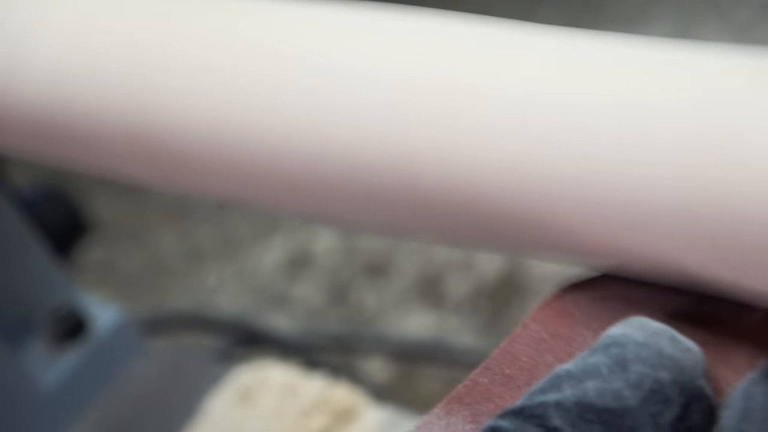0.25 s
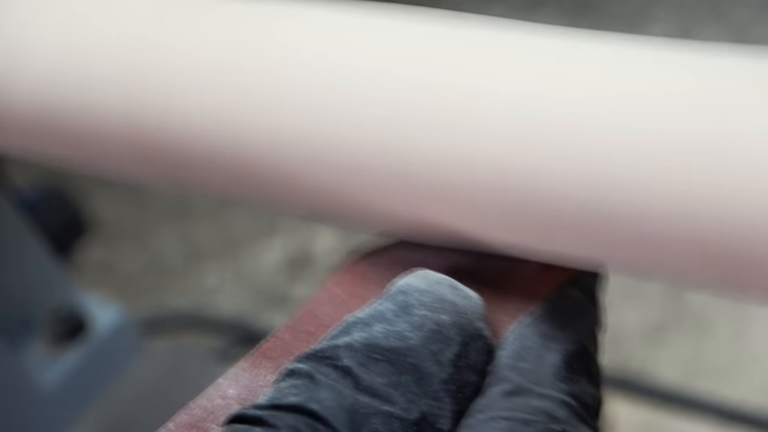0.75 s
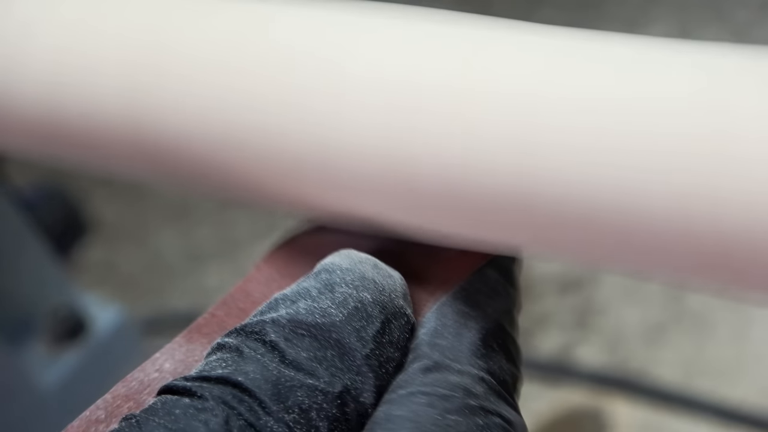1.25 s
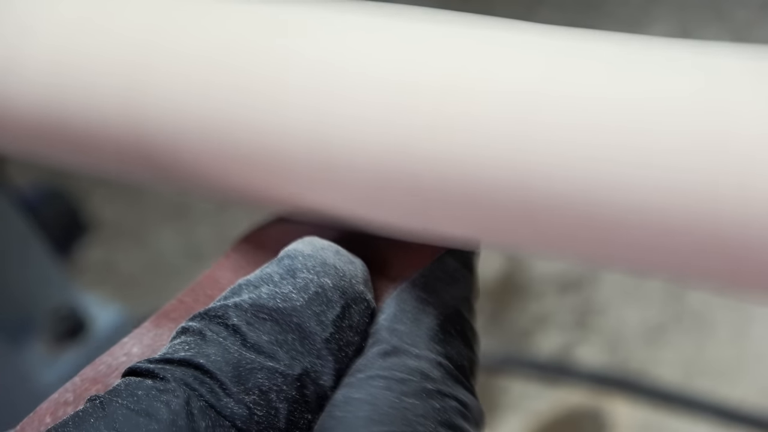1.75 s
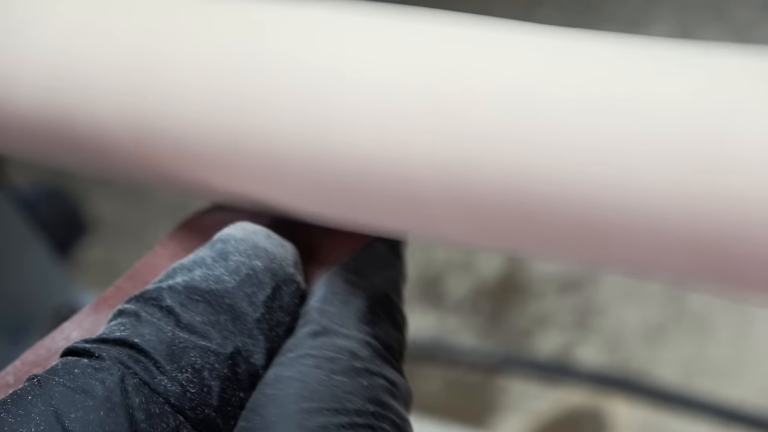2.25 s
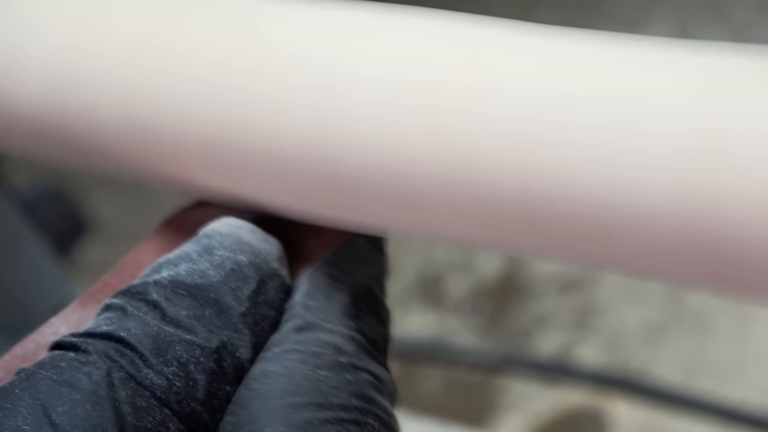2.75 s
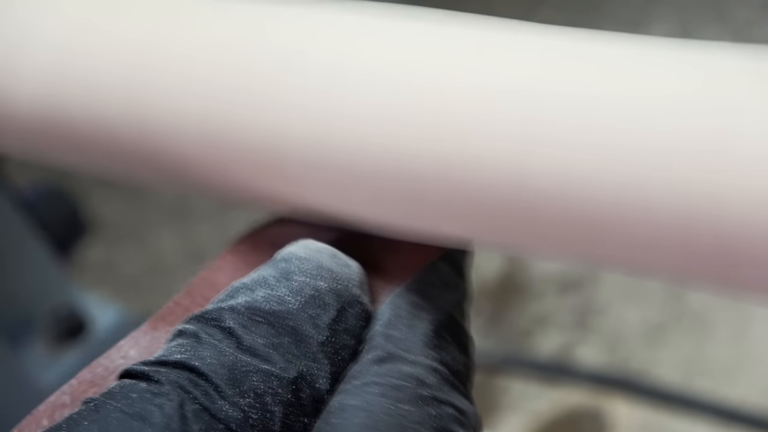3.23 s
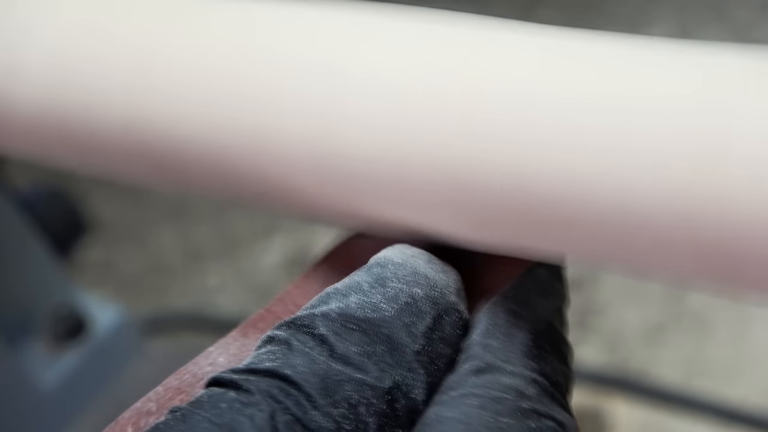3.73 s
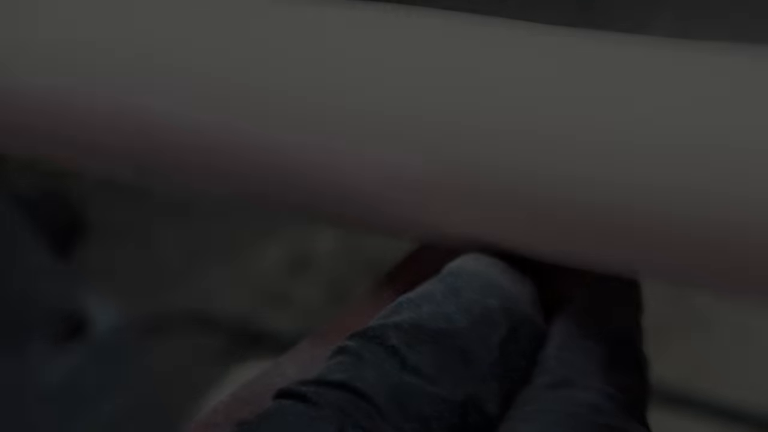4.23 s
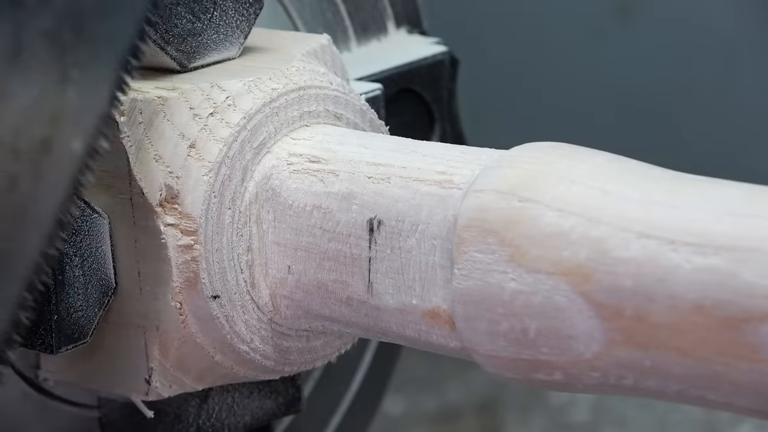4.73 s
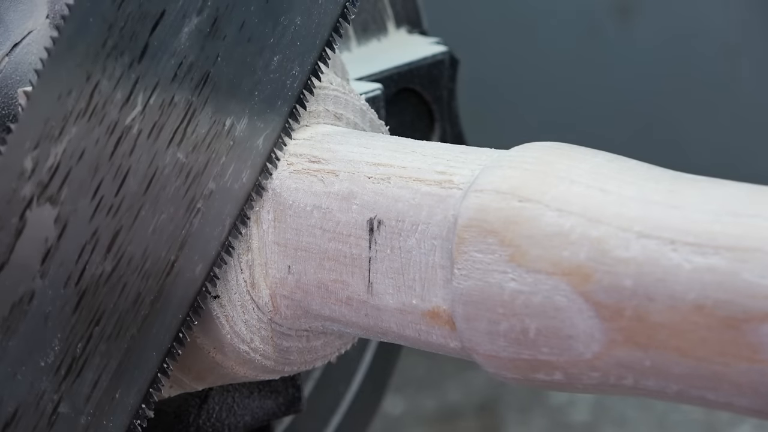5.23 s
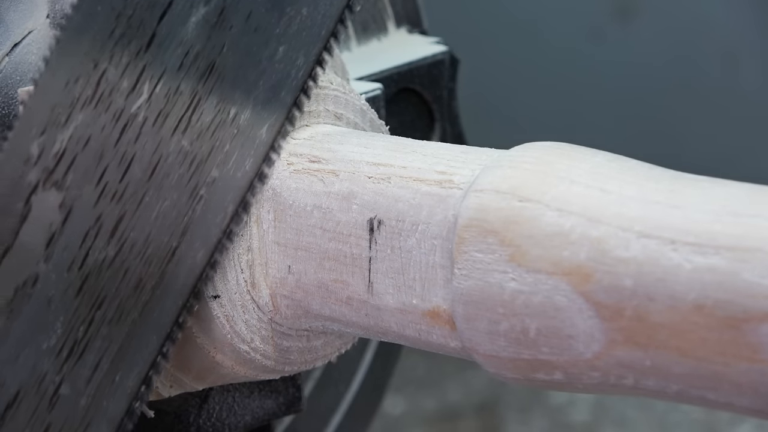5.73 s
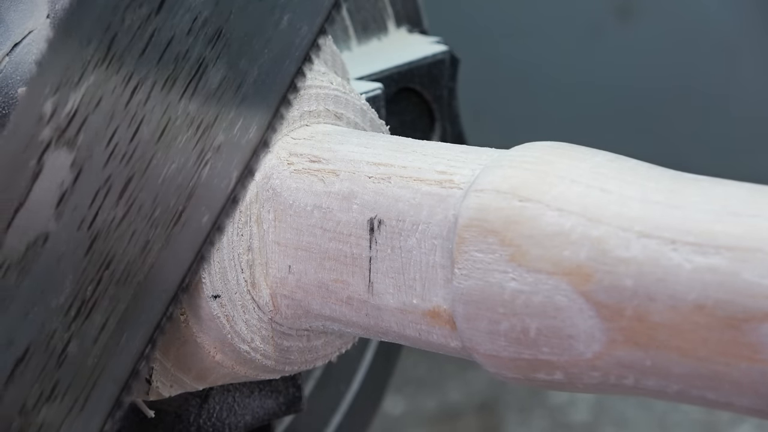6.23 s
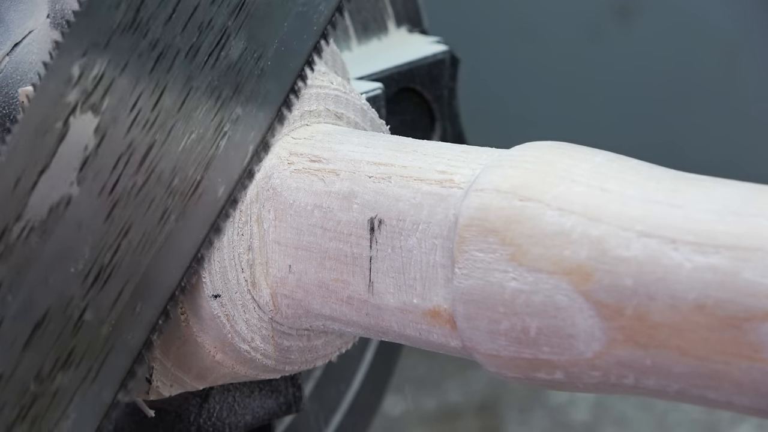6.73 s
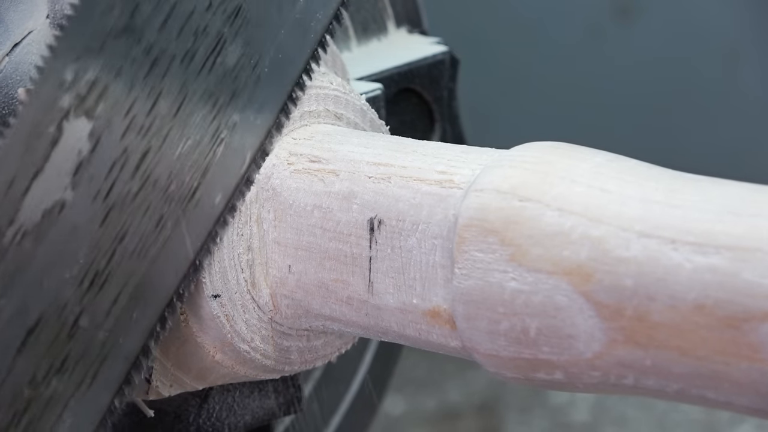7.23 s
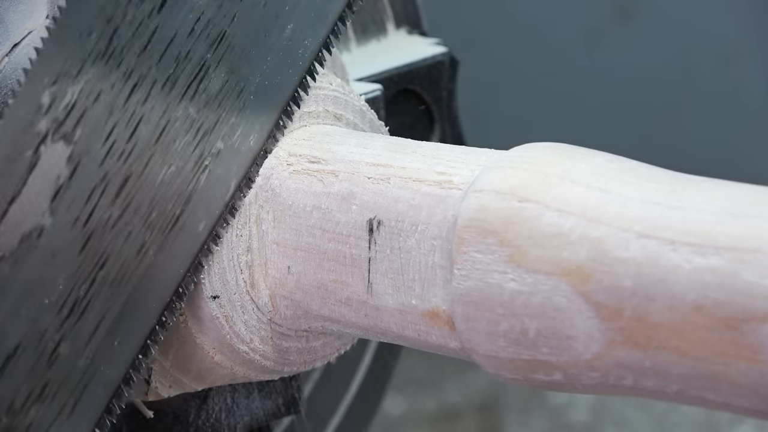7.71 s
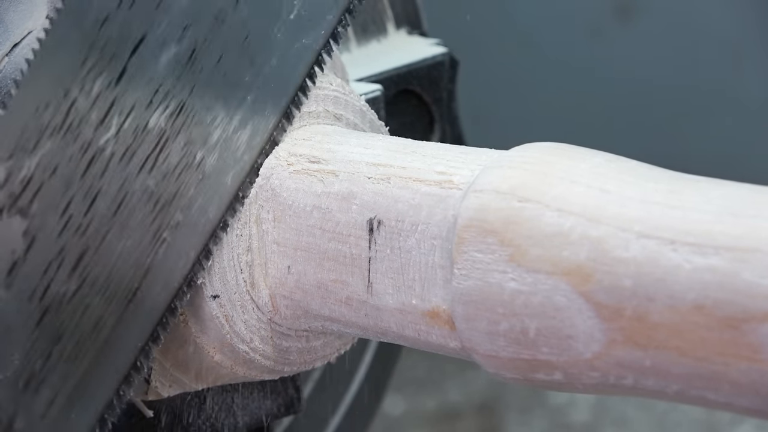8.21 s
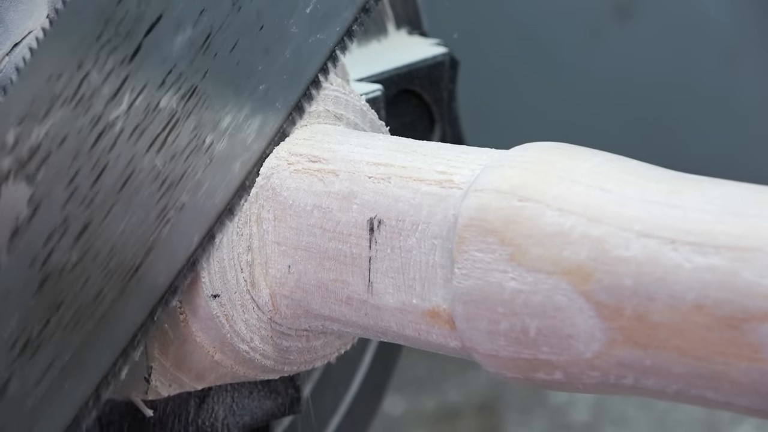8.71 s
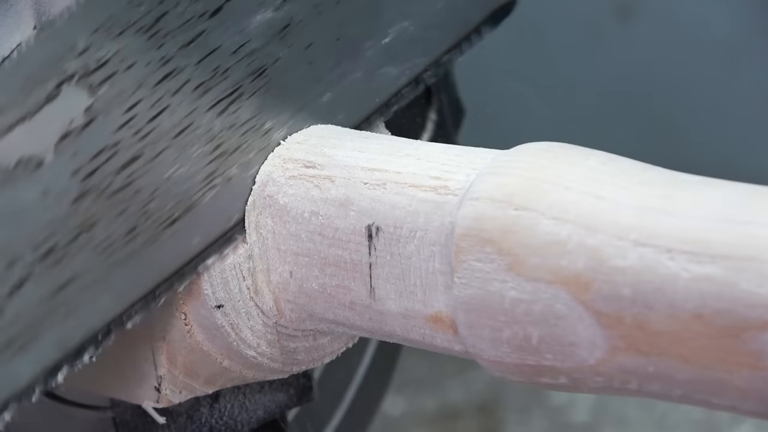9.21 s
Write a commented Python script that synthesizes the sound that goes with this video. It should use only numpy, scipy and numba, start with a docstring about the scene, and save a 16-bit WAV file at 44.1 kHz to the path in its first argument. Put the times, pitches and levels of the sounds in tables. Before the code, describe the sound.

Close to a lathe, an abrasive strip hisses steadily and softly on a spinning wooden handle, with a faint low motor hum, then fades smoothly away. In a quiet workshop, a hand saw taps lightly as it is set on the clamped handle, then rasps hesitantly and speeds into strong, hollow, toothy back-and-forth strokes with ringing steel.

```python
"""Close to a lathe, a strip of abrasive hisses on a spinning, humming wooden handle, then fades away.
Then, in a quiet workshop, a hand saw knocks as it is set on the clamped handle and cuts in quickening strokes.
Sanding is noise shaped by the grit, the turning and the wood; the lathe is a stack of sines.
Sawing is tooth blows and bursts of tearing fibre that ring blade and wood, with brief singing tones and
shudders; a low rumble and a faint hiss of workshop air lie behind it."""
import sys
import numpy as np
from scipy import signal
from scipy.fft import rfft, irfft
from scipy.io import wavfile
from scipy.ndimage import uniform_filter1d
from numba import njit

SR = 44100
rng = np.random.default_rng(int(sys.argv[2]) if len(sys.argv) > 2 else 0)


def store_pcm(level_fs):
    """Save levels as 16-bit WAV."""
    pcm = np.round(np.clip(level_fs, -1, 1) * 32767).astype(np.int16)
    wavfile.write(sys.argv[1], SR, np.atleast_2d(pcm).T)


N = 417186
T = np.arange(N) / SR
FREQ = np.arange(N // 2 + 1) * SR / N

TURN_HZ = 29.7  # spindle speed
CUT_S = 4.345  # the sanding has faded out and the sawing is heard from here
LAST_STROKE_END_S = 9.465
SHUDDER_HZ = 115.3  # bending mode of the clamped handle

# Saw strokes, each lasting until the next reversal; levels are before the trims of each layer:
# (start [s], top tooth rate [Hz], unevenness of the teeth [0-1], attack [s], release [s], rasp [dB],
#  tooth bite [dB], growth of the bite from start to end [dB], hollow ring of the wood [dB],
#  shudder [dB], jerk on setting off [dB], jerk on stopping [dB])
STROKES = [ (5.587, 118.7, 0.29, 0.4, 0.11, -53.5, -59, 0.5, -2, -59, -75, -52),
           (5.989, 119.9, 0.62, 0.047, 0.12, -56, -61, -17, -5, -58, -53.5, -78),
           (6.19, 201.2, 0.25, 0.12, 0.091, -47, -50, 10, -3.5, -54.5, -74, -45),
           (6.542, 212, 0.1, 0.052, 0.12, -41.5, -48, 7, -2.5, -41.5, -65, -40),
           (6.759, 245.1, 0.17, 0.085, 0.12, -38.5, -40, 21.5, -0.5, -44.5, -47, -37),
           (7.042, 199, 0.22, 0.056, 0.13, -33.5, -38, 16.5, -3, -38.5, -37, -35.5),
           (7.278, 230.8, 0.09, 0.045, 0.085, -37.5, -35.5, 15, 3, -64, -33.5, -36.5),
           (7.527, 211, 0.1, 0.059, 0.094, -34, -36.5, -4.5, -3, -41, -41, -34.5),
           (7.788, 277.4, 0.14, 0.048, 0.11, -35.5, -36, -0.5, 3.5, -41.5, -32.5, -45),
           (8.033, 250.2, 0.26, 0.022, 0.094, -33.5, -40, 1, 0, -48, -40.5, -37),
           (8.271, 199.1, 0.07, 0.042, 0.17, -32, -35.5, 27.5, 8, -54, -36.5, -39),
           (8.507, 178.8, 0.07, 0.05, 0.12, -34.5, -38.5, -11, -4, -39.5, -36, -34),
           (8.777, 211.4, 0.28, 0.057, 0.19, -35.5, -45, -18, -0.5, -45, -40, -38.5),
           (9.0, 233.8, 0.12, 0.015, 0.15, -34.5, -42, 3, -3, -56, -48, -58),
           (9.23, 291, 0.17, 0.12, 0.078, -36, -46, 27.5, 3, -65, -51, -57)]
# Resonances of the wood: (frequency [Hz], width [Hz], level [dB])
WOOD_MODES = [(441, 19, 8), (577, 31, 14), (654.4, 20, 11.5), (771, 12, 10), (903, 52, 16.5)]
# Resonances of the blade: (frequency [Hz], width [Hz], level [dB])
BLADE_MODES = [(1295, 14, 1.5), (1593, 26, 2.5), (2145, 26, 9.5), (2250, 30, 5.5), (3010, 220, -1),
               (3797, 40, 7.5), (4270, 33, 4.5), (4420, 110, -5), (4870, 14, 5), (5490, 75, 7),
               (6300, 26, 5), (7110, 19, 5.5), (8320, 49, 7), (9300, 28, 10.5)]


def saw(grain_db=1.5, rasp_trim_db=-8, smear_s=0.00609, chirp_db=-5.5):
    """Teeth chop the wood and tear its fibres; the tearing rings the blade."""
    # colour of the tearing fibres: (frequency [Hz], level [dB])
    rasp_colour = [(530, -28), (900, 12.5), (1130, -13.5), (1290, -7.5), (1420, -12), (2180, -5),
                   (2580, -10), (3740, -7), (4860, -12), (5550, -11.5), (8330, -14), (10300, -20.5),
                   (14400, -17), (15700, -20)]
    # colour of the tooth blows: (frequency [Hz], level [dB])
    bite_colour = [(110, 2), (160, -4), (200, 7), (250, 3.5), (310, -3.5), (450, -9), (600, -10),
                   (780, -12), (950, -21), (1150, -20.5), (2000, -54)]
    rasp_db, treble_db, bite_db = stroke_levels()
    (_, _, uneven, *_, hollow_db, _, _, _), _, _ = stroke_clock()
    blows = tooth_blows()

    # each tooth sets off a burst of snapping fibres over the drag of the blade
    tear_s, drag = .003, .55
    burst = signal.lfilter([1], [1, -np.exp(-1 / (tear_s * SR))], blows)
    snaps = rng.standard_normal(N) * undb(grain_db * np.minimum(rng.exponential(size=N), 7))
    fibres = snaps * (drag + steady(burst, 0.12)) * undb(walk(70))
    tearing = colour(fibres, rasp_colour)
    middle = undb(rasp_db) * steady(band(tearing, 1065, 5490), 0.0254)
    # the treble flickers
    treble = undb(treble_db + walk(45)) * steady(band(tearing, 5280, 19400), 0.029)
    rasp = (middle + treble) * undb(rasp_trim_db)

    crunch = np.sqrt(np.abs(uneven)) * steady(fibres, 0.037)
    chop = colour(steady(blows, 0.077) + crunch, bite_colour)
    # bending waves in the wood are slower at low pitch, which smears each blow
    chop = irfft(rfft(chop) * np.exp(-4j * np.pi * smear_s * np.sqrt(200 * FREQ)), N)
    hollow = undb(hollow_db) * sliding(chop, WOOD_MODES, shift_db=4, rate=10, drift=0.04)
    bite = steady(chop + hollow, 0.062) * undb(bite_db)

    cutting = np.clip((T - STROKES[0][0]) / 0.095, 0, 1)
    squeal = chirps() * undb(rasp_db + rasp_trim_db + chirp_db)
    return (rasp + bite + squeal) * cutting + blade(rasp * cutting)


def tooth_blows(slowest=.45, size_db=1.0):
    """One blow for each tooth that meets the wood; the blade speeds up and slows within each stroke."""
    blows = np.zeros(N)
    ends = [row[0] for row in STROKES[1:]] + [LAST_STROKE_END_S]
    for (start, top_hz, uneven, *_), end in zip(STROKES, ends):
        t = start
        for gap, size in rng.standard_normal((200, 2)):
            if t >= min(end, T[-1]):
                break
            speed = slowest + (1 - slowest) * np.sin(np.pi * (t - start) / (end - start)) ** .5
            blows[int(t * SR)] += undb(size_db * size) / np.sqrt(top_hz * speed)
            t += np.exp(uneven * gap) / (top_hz * speed)
    return blows


def stroke_clock():
    """At every moment: the columns of the current stroke, the time since it began and the time until it ends."""
    rows = np.array(STROKES)
    turns = np.append(rows[:, 0], LAST_STROKE_END_S)
    now = np.clip(np.searchsorted(turns, T, side="right") - 1, 0, len(rows) - 1)
    return rows[now].T, np.maximum(T - turns[now], 0), np.maximum(turns[now + 1] - T, 0)


def stroke_levels(ease_s=0.051, catch_db=2.0, treble_re_rasp_db=-3.5, rasp_growth=0.51, bite_arch_db=6.5):
    """Rasp, treble and bite in dB: the blade gathers speed, runs and brakes; the hand leans in or eases off."""
    (_, _, _, attack_s, release_s, rasp_db, bite_db, growth_db, *_), age, left = stroke_clock()
    slowness = np.maximum(1 - age / attack_s, 0) ** 2 + np.maximum(1 - left / release_s, 0) ** 2
    along = age / (age + left)
    lean_db = growth_db * (along - .5) + catch_db * walk(25)
    # the rasp follows a share of the lean; the teeth bite hardest in mid-stroke
    tearing_db = rasp_db + rasp_growth * lean_db
    chopping_db = bite_db + lean_db - bite_arch_db * (1 - np.sin(np.pi * along))
    # each layer drops by its own amount as the blade slows
    levels = [tearing_db - 29.5 * slowness,
              tearing_db + treble_re_rasp_db - 31 * slowness,
              chopping_db - 14 * slowness]
    return uniform_filter1d(np.array(levels), int(ease_s * SR))


def chirps(count=900, low_hz=1200, high_hz=5600, length_s=0.028, bend=0.022, spread_db=2.5):
    """Single teeth stick and slip on the fibres: a scatter of very short, gliding squeals."""
    out = np.zeros(N + SR)
    for when, pitch, length, slope, strength in rng.random((count, 5)):
        u = np.linspace(0, 1, int(SR * length_s * (.5 + length)))
        hz = low_hz * (high_hz / low_hz) ** pitch * (1 + bend * (2 * slope - 1) * (2 * u - 1))
        gain = undb(spread_db * min(-np.log(1 - strength), 3.5))
        at = int(when * N)
        out[at:at + len(u)] += gain * np.sqrt(u) * (1 - u) ** 2 * np.sin(2 * np.pi * np.cumsum(hz) / SR)
    return steady(out[:N], 0.17)


def blade(x, drift=0.0078, plate_travel=0.072, count=14, size=9, swell_db=4):
    """The steel plate rings; as it runs, modes on one side of the kerf rise, on the other fall; high ones shimmer."""
    # modes that slide as the free length of the blade changes:
    # (at one end of the travel [Hz], at the other [Hz], width [Hz], level [dB])
    travel_modes = [(1324, 1170, 9.4, 13.5), (1743, 2050, 11, 17.5), (2290, 2400, 12.6, 8),
                    (2840, 3120, 16, 7), (3720, 3500, 14, 8.5)]
    place = blade_place()
    bend = drift * np.sin(np.pi * place)
    slide = plate_travel * (place - .5)
    strong = 0
    for from_hz, to_hz, width, db in travel_modes:
        drive = x * undb(swell_db * np.minimum(walk(14), 1.5))
        strong = strong + undb(db) * glide(drive, from_hz + (to_hz - from_hz) * place, float(width))
    # weak and high modes lie at random pitches: (Hz, width Hz, dB)
    weak = [(hz, 15, 7.5) for hz in 1400 + 5400 * (np.arange(count) + rng.random(count)) / count]
    high = [(hz, 12, 9) for hz in 5800 + 9000 * (np.arange(size) + rng.random(size)) / size]
    plate = sliding(x, weak[::2], 5, 11, bend, slide) - sliding(x, weak[1::2], 5, 11, bend, -slide)
    return strong + plate + sliding(x, BLADE_MODES, 5.0, 9, bend) + ring(x, high) + free_ring(x)


def blade_place():
    """Where the blade is in its travel, 0 to 1: out on one stroke and back on the next."""
    turns = [row[0] for row in STROKES] + [LAST_STROKE_END_S]
    return .5 - .5 * np.cos(np.pi * np.interp(T, turns, np.arange(len(turns))))


def free_ring(x, grip_s=5.65, grip_takes_s=.8):
    """The blade rings long and high while it only rests on the wood; the deepening kerf damps it."""
    # resonances of the ungripped blade: (frequency [Hz], width [Hz], level [dB])
    free_modes = [(3500, 6, 17), (3820, 16, 8), (4175, 8, 14), (4840, 6.2, 19), (5340, 11, 10),
                  (5840, 16, 16), (8030, 14, 20), (10600, 20, 14), (13290, 8.7, 23.5)]
    return ring(x * np.clip(1 - (T - grip_s) / grip_takes_s, 0, 1), free_modes)


def snags(overtone_db=-9, rise_s=0.0072, sag=0.069):
    """A snagged tooth lets go and the wood answers with a short, hollow knock whose pitch starts high and sags."""
    # knocks of the wood: (time [s], level before rise and decay [dB], settled pitch [Hz], decay [s])
    snag_table = [(6.672, -53, 215, 0.016), (7.192, -25, 172, 0.014), (7.358, -26, 202, 0.012),
                  (7.195, -33.5, 525, 0.012), (7.482, -29.5, 197, 0.022), (7.542, -35.5, 242, 0.019),
                  (7.613, -27, 201.5, 0.011), (7.647, -35, 219, 0.017), (7.708, -27, 205, 0.022),
                  (7.835, -37, 600, .014), (7.86, -27.5, 726, 0.011), (7.882, -24, 577, 0.0095),
                  (7.915, -30.5, 650, 0.0069), (8.068, -28.5, 213, 0.015), (8.556, -27, 207, 0.014),
                  (8.606, -38, 509, 0.04), (8.822, -37, 577, 0.015)]
    out = np.zeros(N)
    for s, db, hz, decay_s in snag_table:
        at = slice(int(s * SR), int(s * SR) + SR // 4)
        age = T[at] - T[at][0]
        fall = np.exp(-age / decay_s)
        phase = 2 * np.pi * np.cumsum(hz * (1 + sag * fall)) / SR
        tone = np.sin(phase) + undb(overtone_db) * np.sin(2 * phase)
        out[at] += undb(db) * np.sqrt(2) * (1 - np.exp(-age / rise_s)) * fall * tone
    return out


def knocks(thud_s=0.13, trim_db=-5.5, wood_db=-3, blade_db=-3):
    """A short scrape of contact noise rings the blade and the wood, and the handle thuds at its bending mode."""
    # the saw is set down, its teeth catch, fibres crack and the offcut scrapes past:
    # (time [s], scrape level before the trim [dB], centre [Hz], sharpness [Q], rise [s], decay [s], thud [dB])
    knock_table = [(4.368, -60, 1000, 1.7, .0004, .005, -88), (4.635, -57.5, 1900, 1.2, 0.021, .026, -90),
                   (5.033, -62, 2560, 4, .001, 0.0059, -91), (5.169, -52, 1650, 3.8, .0004, 0.0079, -60.5),
                   (5.167, -63, 3500, 1.2, .0004, .008, -77), (5.362, -63, 1600, .8, .004, .05, -63),
                   (5.424, -59, 3800, .37, 0.0023, 0.028, -57), (5.681, -57, 4500, .26, .0006, 0.011, -80),
                   (5.747, -55, 8000, 1.1, .0004, 0.0069, -64), (5.795, -58, 6000, .5, .0005, .006, -67),
                   (5.927, -60, 4660, .8, 0.00058, 0.0087, -74), (6.002, -59, 7000, .5, .0005, 0.0053, -73),
                   (6.033, -45.5, 2280, .27, .0004, .012, -70), (7.062, -44, 3800, .7, .0005, 0.019, -49),
                   (7.872, -25, 2600, 1.1, .0003, .004, -58), (8.072, -36, 2800, .8, .0003, .004, -56),
                   (8.391, -23.5, 2450, 2.2, .0003, .005, -55), (8.402, -28, 2400, 1.7, .0003, 0.0046, -58),
                   (8.788, -37.5, 3520, .51, .0005, 0.013, -50),
                   (9.006, -35.5, 3030, 0.7, 0.00095, 0.022, -64),
                   (9.208, -43.5, 1800, 1.1, .004, 0.045, -59), (9.212, -45, 4200, 5, 0.0073, 0.037, -75)]
    scrapes, thuds = np.zeros(N), np.zeros(N)
    for s, db, hz, sharpness, rise_s, decay_s, thud_db in knock_table:
        at = slice(int(s * SR), int(s * SR) + SR // 2)
        age = T[at] - T[at][0]
        # two equal resonances in series
        contact = [(hz, min(1.17 * hz / sharpness, SR / 4), 0)]
        noise = unit(ring(ring(rng.standard_normal(SR // 2), contact), contact))[:len(age)]
        scrapes[at] += undb(db + trim_db) * noise * (1 - np.exp(-age / rise_s)) * np.exp(-age / decay_s)
        thuds[at] += undb(thud_db) * np.sin(2 * np.pi * SHUDDER_HZ * age) * np.exp(-age / thud_s)
    steel = undb(blade_db) * (ring(scrapes, BLADE_MODES) + free_ring(scrapes))
    wood = undb(wood_db) * ring(scrapes, WOOD_MODES)
    return scrapes + steel + wood + thuds


def judders(waver=0.0124):
    """The teeth strike in step for a moment, and the wood answers with a hollow buzz."""
    # (time of the loudest [s], time from there to 1/e [s], tooth rate [Hz], harmonics 1 to 4 [dB])
    judder_table = [(7.385, 0.022, 225.2, -39, -36, -32, -38), (7.455, 0.023, 227, -39, -45, -37, -49),
                    (8.41, 0.065, 191.5, -39, -45, -42.5, -43), (9.393, 0.026, 289, -45, -38.5, -48, -58)]
    out = np.zeros(N)
    clock = np.cumsum(1 + waver * walk(120)) / SR
    for s, length, hz, *harmonics_db in judder_table:
        at = np.abs(T - s) < np.pi * length
        buzz = sum(undb(db) * np.sin(2 * np.pi * (k * hz * clock[at] + rng.random()))
                   for k, db in enumerate(harmonics_db, 1))
        out[at] += np.sqrt(2) * buzz * np.exp(-((T[at] - s) / length) ** 2)
    return out


def singing_tones(waver=0.00208):
    """Blade and wood sing for a moment: tones ringing on after a knock or across a turn of the stroke, and squeaks."""
    # (time of the loudest [s], length between the 1/e points [s], pitch [Hz], level at the loudest [dB])
    tone_table = [(5.188, 0.032, 1550, -69), (5.193, .035, 4183, -81), (5.393, 0.032, 4860, -77),
                  (5.493, 0.046, 4840, -81), (6.29, 0.045, 1750, -50.5), (6.73, 0.086, 1757, -60),
                  (7.236, 0.071, 1750, -47.5), (7.5, 0.091, 7000, -57), (7.75, 0.055, 1760, -58),
                  (7.987, 0.16, 4900, -55), (8.0, 0.065, 1073, -57), (8.215, 0.11, 947, -51),
                  (8.49, 0.085, 1530, -47.5), (8.496, .1, 6971, -58), (8.71, 0.095, 943, -53.5),
                  (8.734, 0.15, 2270, -58), (8.91, 0.05, 1990, -47.5), (9.11, 0.043, 686, -48),
                  (9.11, 0.0099, 4370, -39), (9.241, 0.028, 1390, -51), (9.427, 0.088, 868, -46.5)]
    clock = np.cumsum(1 + waver * walk(150)) / SR
    out = np.zeros(N)
    for s, length, hz, db in tone_table:
        swell = np.exp(-np.minimum((2 * (T - s) / length) ** 2, 20))
        out += undb(db) * np.sqrt(2) * np.sin(2 * np.pi * hz * clock) * swell
    return out


def shudder(waver=0.0556, flutter_db=2.0, bend_db=-2.5, rattle_db=-9, sway_db=-33):
    """The clamped handle shakes at its bending mode, the clamp rumbles and the bench sways under it."""
    bend = np.sqrt(2) * np.sin(2 * np.pi * np.cumsum(SHUDDER_HZ * (1 + waver * walk(50))) / SR)
    force = shaking_force()
    rattle = unit(colour(rng.standard_normal(N), [(30, 1.5), (60, -36), (85, 4.0), (130, -1.5), (180, -15),
                                                  (300, -10.5), (900, -75)]))
    sway = unit(colour(rng.standard_normal(N), [(6, -12), (16, 1), (28, 2), (50, -1), (85, -25),
                                                (140, -30), (400, -73)]))
    # the clamp and the bench follow the force more sluggishly
    clamp = undb(rattle_db) * rattle * uniform_filter1d(force, int(.1 * SR))
    bench = undb(sway_db) * sway * uniform_filter1d(force, int(.3 * SR))
    return force * bend * undb(bend_db + flutter_db * walk(40)) + clamp + bench


def shaking_force(ease_s=0.034, jerk_delay_s=0.043, jerk_lead_s=0.032, jerk_s=0.041):
    """The running blade shakes the handle most in mid-stroke, and jerks it on either side of a reversal."""
    (*_, shudder_db, set_off_db, stop_db), age, left = stroke_clock()
    running = undb(shudder_db) * np.sin(np.pi * age / (age + left))
    set_off = undb(set_off_db) * np.exp(-((age - jerk_delay_s) / jerk_s) ** 2)
    stop = undb(stop_db) * np.exp(-((left - jerk_lead_s) / jerk_s) ** 2)
    force = np.sqrt(running ** 2 + set_off ** 2 + stop ** 2) * (T > STROKES[0][0])
    return uniform_filter1d(force, int(ease_s * SR))


def sanding(repeat_hz=2400, oval=0.095, wobble=0.02, direct_db=-2, hiss_db=-52.5):
    """Grit scratches the wood; the same grain comes round each turn and the oval handle presses twice a turn."""
    # colour of the abrasive: (frequency [Hz], level [dB])
    grit_colour = [(40, -16), (90, -11), (160, -12.5), (550, -14), (900, -11), (1600, -13), (2500, -9),
                   (3250, -6.5), (3560, -5.5), (3850, -1.5), (4350, 0), (4700, 0.5), (5150, -0.5),
                   (6500, -3.5), (8000, -6), (12000, -6.5), (15700, -0.5)]
    # resonances of the handle: (frequency [Hz], width [Hz], near the end [dB], further along [dB])
    strip_modes = [(700, 47, -16, -28), (2050, 400, 8, -18), (2850, 200, 3, -7), (3320, 150, 0, -10.5),
                   (3870, 200, 4.5, -10), (4210, 250, -5, -7), (5300, 390, -17, 2), (6580, 490, -3.5, 0),
                   (8750, 350, -16, -6)]
    # the strip slides along the handle: (time [s], place [0-1])
    strip_place = [(0, 0.34), (.5, 0.43), (.9, 0.38), (1.4, 0.6), (2.3, 0.8), (3.2, 0.78), (4.3, 0.55)]
    # the fingers lean on the strip and ease off: (time [s], level of the middle of the hiss [dB])
    finger_press = [(0, -2), (.25, -0.5), (.55, -1), (.95, 0.3), (1.6, 0), (2.4, -0.4), (2.8, 0),
                    (3.1, -2.5), (4.3, -.5)]

    turn = TURN_HZ * T + .004 * np.cumsum(walk(3)) / SR * TURN_HZ
    count = int(SR / TURN_HZ)
    grain = rng.standard_normal(count)[(turn % 1 * count).astype(int)]
    # coarse scratches repeat with the grain of the wood, fine ones are always new
    repeating = colour(grain, [(200, -7), (900, -3), (repeat_hz, -7), (9000, -16)])
    scratches = rng.standard_normal(N) + repeating
    pressure = 1 + oval * (np.sin(4 * np.pi * turn) + .5 * np.sin(8 * np.pi * turn))
    pressure = pressure + wobble * np.sin(2 * np.pi * turn) + 0.045 * walk(300) + 0.057 * walk(13)
    rubbed = colour(scratches * pressure, grit_colour)

    place = np.interp(T, *np.transpose(strip_place))
    hiss = undb(direct_db) * rubbed
    for hz, width, near_db, far_db in strip_modes:
        mode = sliding(rubbed, [(hz, width, 0)], shift_db=0.3, rate=3.9, drift=0.0048)
        hiss = hiss + mode * undb(near_db + (far_db - near_db) * place)
    # a close reflection ripples the hiss into broad bands, more strongly further along
    echo_s, echo = .000973, .22
    reflected = np.roll(band(hiss, 2300, 18000), int(round(echo_s * SR)))
    hiss = hiss + echo * np.sqrt(np.abs(place)) * reflected

    scrub_db = -5.5 + (-9.5 + 5.5) * place  # from near the end to further along
    scrub = undb(scrub_db) * band(hiss, 40, 3290) / np.std(band(hiss, 570, 3430))
    middle = unit(band(hiss, 3110, 7980)) * undb(np.interp(T, *np.transpose(finger_press)))
    fine = unit(band(hiss, 7570, 14750))
    return (scrub + middle + fine) * undb(hiss_db) * fade_out()


def lathe():
    """The unbalanced spindle and the motor hum, fading out with the sanding."""
    # hum before the fade: (multiple of the spindle speed, level [dB])
    hum = [(1, -71.5), (2, -81.5), (3, -80), (4, -107), (7.5, -86.5), (11, -86), (12, -95), (23.55, -79.5)]
    turn = TURN_HZ * np.cumsum(1 + 0.00237 * walk(4.11)) / SR
    tones = sum(undb(db) * np.sqrt(2) * np.sin(2 * np.pi * (k * turn + rng.random())) for k, db in hum)
    return fade_out() * tones


def fade_out(fade_s=1.02):
    """The work at the lathe fades smoothly to silence."""
    return np.sin(np.pi / 2 * np.clip((CUT_S - T) / fade_s, 0, 1))


def air(level_db=-65):
    """A low rumble and a faint hiss fill the workshop: shaped noise, wider in the treble."""
    # colour of the air: (frequency [Hz], level [dB])
    air_colour = [(10, -7), (20, -4), (30, 3.5), (50, -8), (80, -11.5), (150, -17), (250, -21),
                  (500, -28.5), (1500, -32), (5000, -35.5), (15700, -39)]
    mid, side = (unit(colour(rng.standard_normal(N), air_colour)) for _ in range(2))
    side = colour(side, [(60, -14), (300, -8.5), (2000, -0.5), (12000, -3.5)])
    return undb(level_db) * np.array([mid + side, mid - side])


def undb(db):
    """Decibels to gain."""
    return np.exp(np.asarray(db) * np.log(10) / 20)


def unit(x):
    """Scale to rms 1."""
    return x / np.sqrt(np.mean(x ** 2))


def steady(x, window_s):
    """Even out the slow level of a source to about rms 1, so that later gains set it."""
    power = uniform_filter1d(x ** 2, int(window_s * SR))
    return x / np.sqrt(np.abs(power) + np.mean(x ** 2) / 1000)


def walk(rate):
    """Smooth chance with spread 1, changing rate times a second."""
    size = max(int(SR / rate), 1)
    steps = np.repeat(rng.standard_normal(N // size + 1), size)[:N]
    return unit(uniform_filter1d(steps, size))


def colour(x, points):
    """Filter by a spectrum of (Hz, dB) points."""
    hz, db = np.transpose(points)
    return irfft(rfft(x) * undb(np.interp(np.log(FREQ + 1), np.log(hz), db)), N)


def band(x, lo_hz, hi_hz):
    """The part of a sound between two frequencies; bands that share an edge add up to the whole."""
    return irfft(rfft(x) * (1 / (1 + (FREQ / hi_hz) ** 12) - 1 / (1 + (FREQ / lo_hz) ** 12)), N)


def ring(x, modes):
    """Pass a sound through parallel resonances."""
    return sum(undb(db) * signal.lfilter(*signal.iirpeak(hz, hz / width, SR), x) for hz, width, db in modes)


def sliding(x, modes, shift_db, rate, drift, slide=0):
    """Resonances driven from a moving contact: all slide by a share; each swells, drops out and bends by itself."""
    out = 0
    for hz, width, db in modes:
        drive = x * undb(shift_db * np.minimum(walk(rate), 1.5))
        out = out + undb(db) * glide(drive, hz * (1 + slide + drift * walk(rate)), float(width))
    return out


@njit
def glide(x, hz, width):
    """A resonance whose centre moves, renewed every 16 samples; gain 1 at the centre."""
    y, b, l = np.empty(len(x)), 0., 0.
    g, k = 0., 0.
    for i in range(len(x)):
        if i % 16 == 0:
            g, k = np.tan(np.pi * hz[i] / SR), width / hz[i]
        v = (b + g * (x[i] + 1e-18 - l)) / (1 + g * (g + k))
        b, l, y[i] = 2 * v - b, l + 2 * g * v, k * v
    return y


def wide(source, width):
    """Stereo: mid and side hear different parts of the rubbing surfaces; width gives (Hz, side minus mid dB)."""
    mid, side = source(), colour(source(), width)
    return np.array([mid + side, mid - side])


def scene(fade_in_s=0.0075):
    """Sanding at the lathe, then sawing at the bench."""
    # how far the sanding spreads: (frequency [Hz], side minus mid [dB])
    sand_width = [(60, 4), (110, -10), (200, -6), (380, -3), (700, -5), (1290, -4.5), (2380, -6),
                  (4400, -5), (8120, -3.5), (15000, -6)]
    # how far the sawing spreads: (frequency [Hz], side minus mid [dB])
    saw_width = [(60, -23), (110, -24.5), (200, -18), (380, -6.5), (700, -11), (1290, -5), (2380, -5),
                 (4400, 0), (8120, -6), (15000, -11)]
    bench = wide(lambda: saw() + shudder() + knocks() + snags() + judders(), saw_width)
    sawing = bench + singing_tones() + air()
    return wide(sanding, sand_width) + lathe() + sawing * np.clip((T - CUT_S) / fade_in_s, 0, 1)


def record(dry, top_hz=15800):
    """The recorder cuts the top with a steep low-pass."""
    return signal.sosfilt(signal.ellip(12, .1, 80, top_hz, fs=SR, output="sos"), dry)


dry = scene()
out = record(dry)
store_pcm(out)
```